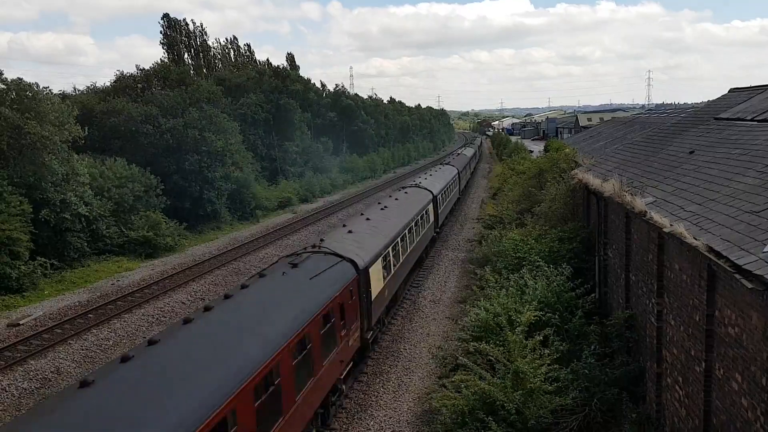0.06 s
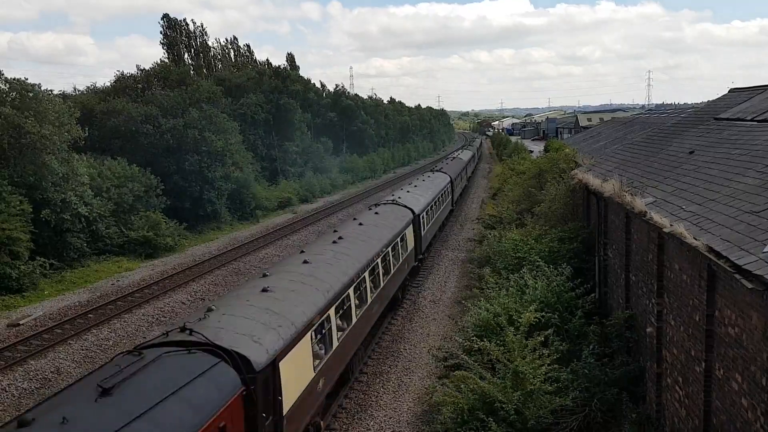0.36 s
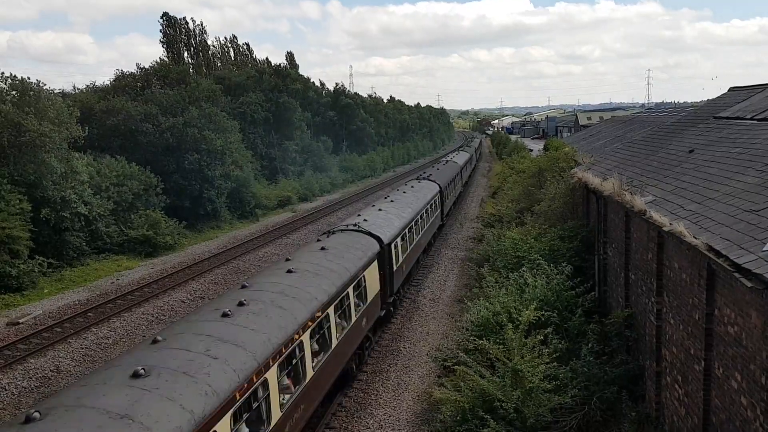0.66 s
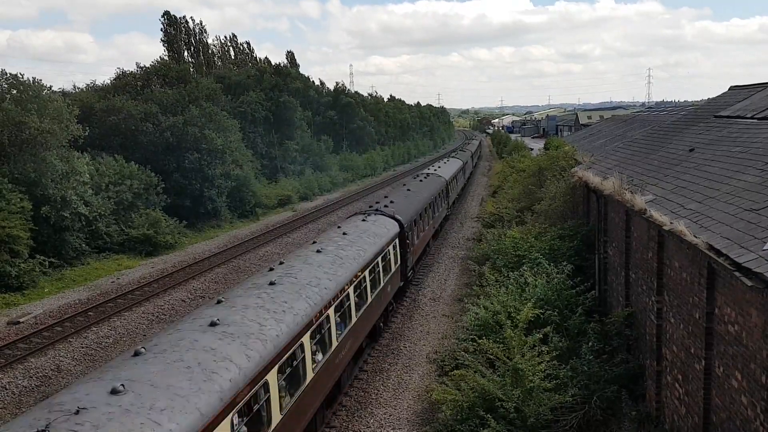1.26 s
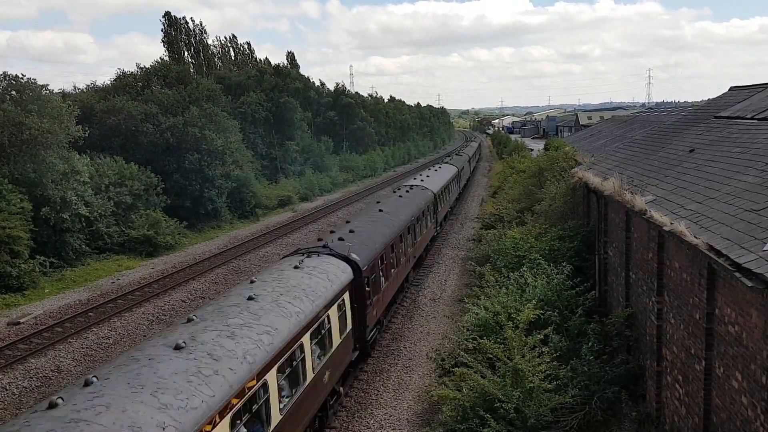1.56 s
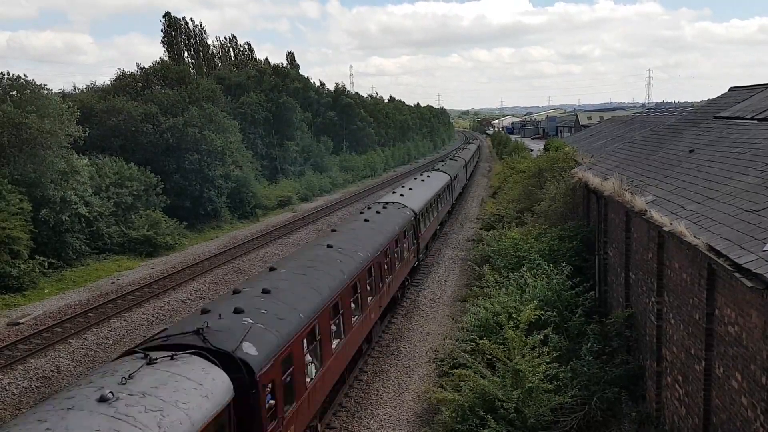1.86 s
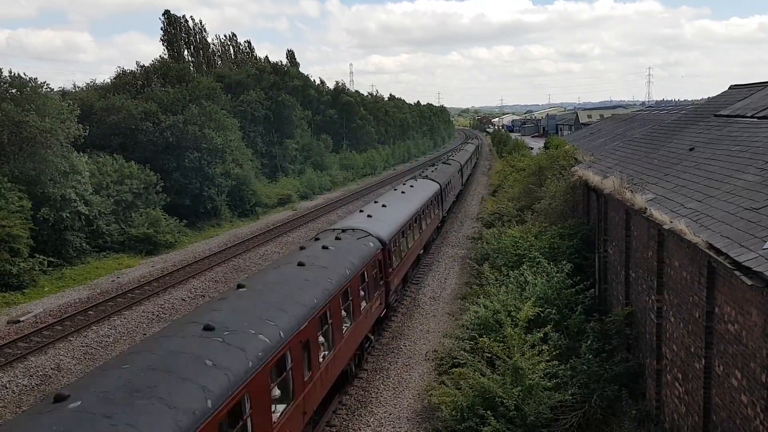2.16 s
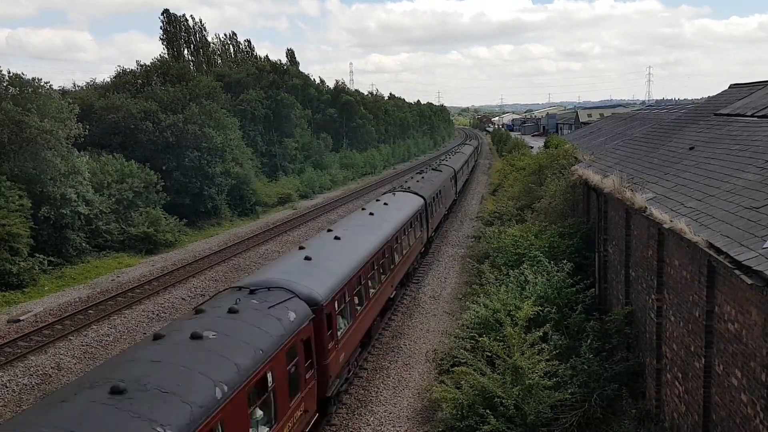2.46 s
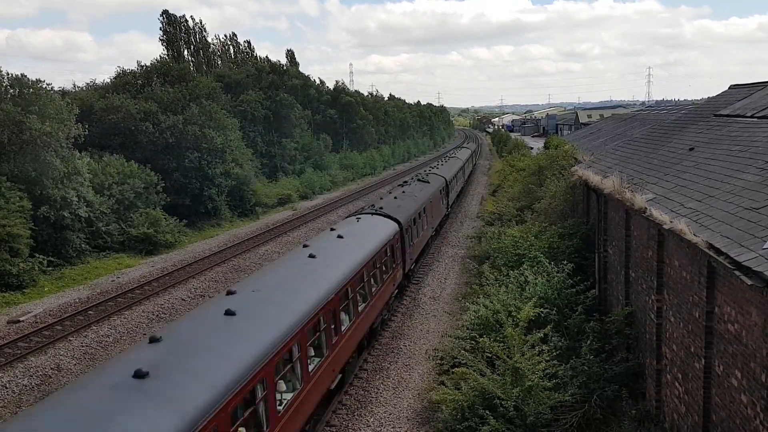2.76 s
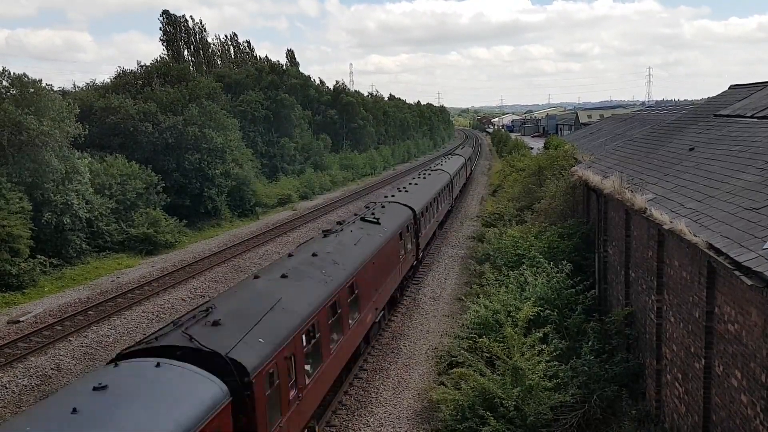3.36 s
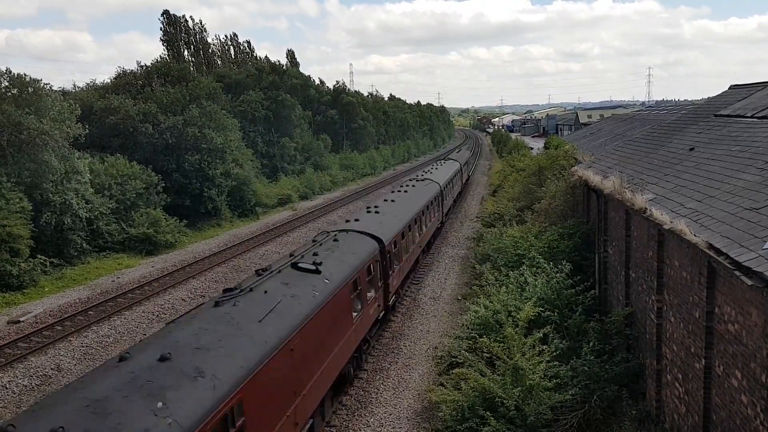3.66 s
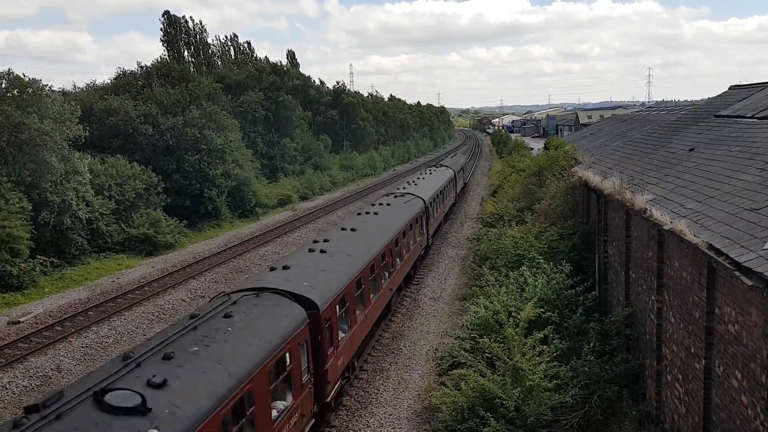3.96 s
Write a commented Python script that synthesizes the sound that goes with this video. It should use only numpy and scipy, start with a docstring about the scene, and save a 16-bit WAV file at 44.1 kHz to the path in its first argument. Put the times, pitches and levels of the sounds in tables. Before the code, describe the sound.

Railway coaches roll past outdoors, rumbling and hissing, their wheels knocking faintly on rail joints.

```python
"""Coaches below a footbridge

Railway coaches roll steadily away. Rough wheels drive the sleepers, the rails and their own rims into
broad resonances that swell and sink in pitch as each pair of bogies passes, over a rumble and a steely
hiss. Wheels knock faintly on rail joints and scuff the rail, and a breeze brushes the microphone."""
import sys
import numpy as np
from scipy.fft import rfft, irfft, next_fast_len
from scipy.io import wavfile
from scipy.ndimage import uniform_filter1d, minimum_filter1d, map_coordinates

SR = 44100
rng = np.random.default_rng(int(sys.argv[2]) if len(sys.argv) > 2 else 0)


def master_out(mix):
    """Clip the mix to full scale and print it as 16-bit PCM to the path in sys.argv[1]."""
    frames = np.transpose(np.atleast_2d(mix))
    ceiling = np.clip(frames, -1, 1)
    pcm = np.round(ceiling * 32767).astype(np.int16)
    wavfile.write(sys.argv[1], SR, pcm)


N = 176400

# The bright spectrum of rubbing steel. Each row: frequency in Hz, relative density in dB.
SIZZLE_SPECTRUM = [(3000, -26), (7000, 4), (8300, -4), (9300, -2.5), (12000, -1.5), (15700, -14.5)]


def amp(db):
    """Amplitude grows tenfold for every 20 dB."""
    return 10 ** (np.asarray(db) / 20)


def unit(x):
    """Normalisation scales a signal to rms 1."""
    return x / np.sqrt(np.mean(abs(x) ** 2) + 1e-20)


def along(points, hz):
    """Interpolation joins (Hz, value) points on a logarithmic frequency axis."""
    f, v = np.transpose(points)
    return np.interp(np.log(hz + 1), np.log(f + 1), v)


def curves(rows):
    """Linear interpolation turns each column after the time into one value per sample."""
    s, *cols = np.transpose(rows)
    return [np.interp(np.arange(N) / SR, s, c) for c in cols]


def wobble(rate):
    """A spline through random knots, rate of them a second, fluctuates smoothly."""
    return map_coordinates(rng.standard_normal(1000), [np.arange(N) * rate / SR], mode="mirror")


def filtered(x, response):
    """A linear filter multiplies the spectrum by its frequency response."""
    m = next_fast_len(N + SR // 2)
    return irfft(rfft(x, m) * response(np.fft.rfftfreq(m, 1 / SR)), m)[..., :N]


def spread(pair, alike, pan_db):
    """Mid-side mixing gives two independent signals a correlation (alike) and a balance (left over right)."""
    turn = np.arccos(np.clip(alike, -1, 1)) / 2
    mid, side = np.cos(turn) * pair[0], np.sin(turn) * pair[1]
    return np.array([(mid + side) * amp(pan_db / 2), (mid - side) * amp(-pan_db / 2)])


def rush(spectrum, alike, pan):
    """Spectral shaping colours stereo noise of rms 1; alike and pan are numbers or (Hz, value) points."""
    hz = np.fft.rfftfreq(N, 1 / SR)
    read = lambda v: along(v, hz) if np.ndim(v) else v
    coloured = rfft(rng.standard_normal((2, N))) * amp(along(spectrum, hz))
    return unit(irfft(spread(coloured, read(alike), read(pan)), N))


def resonance(hz, width_hz, alike, pan_db, evenness=0.27):
    """A randomly driven mode gives a noise band, here of rms 1; many wheels even out its level."""
    offset_hz = np.fft.fftfreq(N, 1 / SR)
    shape = 1 / (1 + (offset_hz / width_hz) ** 2) ** 2
    drive = rng.standard_normal((2, N)) + 1j * rng.standard_normal((2, N))
    envelope = spread(np.fft.ifft(drive * shape), alike, pan_db)
    power = abs(uniform_filter1d(np.mean(abs(envelope) ** 2, axis=0), size=3000)) + 1e-20
    carrier = np.exp(2j * np.pi * np.cumsum(hz * np.ones(N)) / SR)
    return unit((envelope / power ** (evenness / 2) * carrier).real)


def track():
    """Forced vibration: sleepers and rails swell under the bogies, their pitch swinging once a coach."""
    # Track modes. Each row: frequency in Hz, width in Hz, level in dB, share of the sleepers' swell,
    # pitch swing in Hz, left-right correlation, balance in dB.
    modes = [(397, 67, -26, 0.52, -14.5, 0.93, -4.5), (473.2, 79, -21, 1.3, 24.5, 1, -1.5),
             (560.6, 103, -21, .8, 10, 0.94, -1), (771, 94, -22, 0.45, 6, 1, 1.9),
             (859, 132, -20.5, 0.1, 10.5, 0.8, 1)]
    # The sleepers' drone, the rail's narrow ring and its high singing.
    # Each row: time in seconds, relative level in dB.
    sleeper_swell = [(0, 0), (.2, -2.5), (.55, 4.5), (.75, 1), (.97, -2), (1.25, 1.5), (1.8, -2.5),
                     (2.07, 2.6), (2.55, -5), (2.85, 3), (3, -2.5), (3.3, -1), (3.58, 1), (3.7, -.5),
                     (3.85, 1.3), (3.92, -4.5)]
    ring_levels = [(0, -33), (.4, -32), (.72, -21.5), (1.3, -29.5), (1.5, -29), (1.72, -24), (2.3, -25),
                   (2.7, -23), (3.1, -22.5), (3.35, -26), (3.55, -21.5), (3.85, -22), (4, -29)]
    sing_levels = [(0, -46), (.5, -39.5), (.9, -42), (1.15, -39.5), (1.5, -41), (2, -42.5), (2.35, -43.5),
                   (2.8, -40), (3.15, -44.5), (3.42, -41), (3.6, -46.5), (3.73, -43), (4, -47.5)]
    first_bogie_s, coach_period_s = .54, .775
    swell_db, = curves(sleeper_swell)
    ring_db, = curves(ring_levels)
    sing_db, = curves(sing_levels)
    bend = -np.sin(2 * np.pi * (np.arange(N) / SR - first_bogie_s) / coach_period_s)
    drone = sum(amp(db + share * swell_db) * resonance(hz + swing * bend, width, alike, pan)
                for hz, width, db, share, swing, alike, pan in modes)
    sing = resonance(hz=2750, width_hz=530, alike=.2, pan_db=-0.5)
    ring = resonance(hz=860.5 + 10 * bend, width_hz=52, alike=0.82, pan_db=-2.0, evenness=1.0)
    return drone + amp(sing_db) * sing + amp(ring_db + 2) * ring


def wheels():
    """Wheel modes: the rims ring in a slowly sinking band amid broader ones; one briefly rings higher."""
    # The rims' ring and the higher ring. Each row: time in seconds, pitch in Hz, level in dB.
    rim_path = [(0, 1440, -34), (.25, 1450, -27), (.52, 1490, -25), (.82, 1475, -23.5), (1.05, 1452, -24),
                (1.45, 1430, -25.5), (1.7, 1440, -26), (1.95, 1435, -28), (2.12, 1445, -25),
                (2.35, 1440, -29.5), (2.68, 1480, -23), (2.87, 1450, -35), (3.02, 1435, -20.5),
                (3.14, 1420, -33.5), (3.4, 1390, -30.5), (3.65, 1385, -35.5), (3.78, 1415, -26.5),
                (4, 1415, -30)]
    high_path = [(3.15, 1970, -60), (3.27, 1960, -34), (3.42, 1940, -39), (3.7, 1840, -44.5),
                 (3.95, 1800, -61.5)]
    # Broad modes. Each row: frequency in Hz, width in Hz, relative level in dB, correlation, balance in dB.
    modes = [(1069.6, 280, 10.5, 0.21, -1.5), (1844, 160, -3.5, 0.36, -0.5), (2057, 380, -7, 0.35, -6)]
    # Their common gain. Each row: time in seconds, gain in dB.
    mode_gains = [(0, -40.5), (.6, -39), (1.1, -36), (1.5, -33), (2, -38), (2.35, -39), (2.6, -33.5),
                  (3, -33), (3.3, -33.5), (3.6, -39), (4, -42.5)]
    rim_hz, rim_db = curves(rim_path)
    high_hz, high_db = curves(high_path)
    broad_db, = curves(mode_gains)
    broad = sum(amp(db) * resonance(hz, width, alike, pan, evenness=0.18)
                for hz, width, db, alike, pan in modes)
    rim = amp(rim_db) * resonance(rim_hz, width_hz=98, alike=-0.88, pan_db=8.0)
    high = amp(high_db) * resonance(high_hz, width_hz=77, alike=.6, pan_db=-3.5)
    return rim + high + amp(broad_db) * broad


def roar():
    """Rolling noise: the whole train radiates a broadband rumble that wavers in level."""
    spectrum = [(20, -34), (40, -17), (62, -15), (125, -8.5), (175, -10), (250, -5.5), (315, -7),
                (500, 0.5), (680, -2), (950, 1.5), (1120, -3.5), (1300, -4.5), (1480, -11), (1640, -19.5),
                (2300, -31), (3200, -46), (6000, -76)]  # Each row: frequency in Hz, relative density in dB.
    likeness = [(40, 0.77), (90, 1), (200, 0.93), (480, 0.97), (680, 0.42), (880, 0.61), (1000, -0.38),
                (1150, 0.058), (1350, -1.02), (1650, 0.73)]  # Each row: frequency in Hz, left-right correlation.
    balance = [(40, -7.5), (90, 2.5), (170, -2), (500, 3.5), (700, -5), (1050, -4), (1300, -0.5),
               (1600, 7.5), (2300, -13.5)]  # Each row: frequency in Hz, balance in dB.
    return amp(-15.5 + 1.5 * wobble(rate=8.36)) * rush(spectrum, likeness, balance)


def hiss():
    """Friction of steel on steel gives a steady hiss, with a bright sizzle that comes and goes."""
    spectrum = [(1200, -15.5), (2200, 6.5), (3000, -0.5), (3400, -1), (4200, -2.5), (5200, -5), (6200, -9),
                (7200, -14), (8100, -12), (9200, -21.5), (11000, -20.5), (13000, -30.5), (15700, -36)]  # Each row: frequency in Hz, relative density in dB.
    balance = [(2800, 1.5), (3900, -2), (4600, -1), (6200, -1), (8000, -5), (10000, 1.5)]  # Each row: frequency in Hz, balance in dB.
    # Envelopes of the hiss and the sizzle. Each row: time in seconds, relative level in dB.
    hiss_levels = [(0, -46.5), (.1, -47), (.35, -46.5), (.52, -45), (.6, -46.5), (1.1, -45.5),
                   (1.27, -45.5), (1.34, -47), (1.42, -46), (1.51, -44.7), (1.57, -47), (1.68, -47.5),
                   (1.73, -46), (2.2, -47.5), (2.34, -48.5), (2.5, -46.5), (3.05, -45.5), (3.43, -44.5),
                   (3.55, -45.5), (3.61, -48), (3.74, -45.7), (3.92, -48)]
    sizzle_levels = [(0, -59.5), (.12, -63.5), (.35, -65), (.5, -58.5), (.62, -64.5), (1.1, -63),
                     (1.28, -60), (1.5, -62), (1.6, -67.5), (2.15, -61), (2.35, -67.5), (2.7, -62),
                     (3.1, -59), (3.2, -56.5), (3.44, -56.5), (3.55, -57), (3.63, -60), (3.76, -58.5),
                     (4, -66)]
    hiss_db, = curves(hiss_levels)
    sizzle_db, = curves(sizzle_levels)
    flutter_db = 0.67 * wobble(rate=16)
    body = amp(7.5 + hiss_db + flutter_db) * rush(spectrum, alike=-.1, pan=balance)
    sizzle = amp(sizzle_db + 2.2 * flutter_db) * rush(SIZZLE_SPECTRUM, alike=.05, pan=-.6)
    return body + sizzle


def breeze():
    """Turbulent pressure: wind buffets the microphone ports in soft, low lumps."""
    gusts = [(0, -47), (.36, -49), (.41, -30.5), (.7, -32), (.95, -41.5), (1.28, -34.5), (1.5, -37),
             (1.65, -50), (2.3, -47.5), (4, -58)]  # Each row: time in seconds, mean level in dB.
    spectrum = [(15, -34), (28, -16), (42, 1), (75, -0.5), (120, -0.5), (250, -33), (800, -82)]  # Each row: frequency in Hz, relative density in dB.
    gust_db, = curves(gusts)
    return amp(gust_db + 2.5 * wobble(rate=18)) * rush(spectrum, alike=0.24, pan=-11.5)


def joints():
    """Impact excitation: a wheel crossing a joint gives a dull thud, a short shudder and a faint tick."""
    # Each row: start in seconds, thud level in dB, thud frequency in Hz, tick level in dB.
    impacts = [(0.031, -22, 226, -53), (0.524, -21, 182, -54.5), (1.156, -29, 200, -46.5),
               (1.265, -30, 116, -48), (1.382, -20, 253, -52), (1.503, -15.5, 197, -42),
               (1.613, -15.5, 265, -64.5), (1.732, -20.5, 247, -52), (1.756, -22.5, 228, -58),
               (1.946, -21.5, 242, -60), (1.977, -21, 236, -53), (2.3, -28, 83, -68.5),
               (2.897, -23, 159, -47.5), (3.41, -23, 269.5, -48), (3.715, -27, 220, -52)]
    tick_spectrum = [(800, -5.5), (2500, -3.5), (5000, 2), (8000, -6.5), (10000, -12), (15700, -19.5)]  # Each row: frequency in Hz, relative density in dB.
    thud_rise_s, noise_rise_s, tick_t60_s = .009, .003, .2
    shudder_db, shudder_t60_s, shudder_octaves = -6, 0.19, .5
    out = np.zeros((2, N))
    for start, thud_db, hz, tick_db in impacts:
        t = np.maximum(np.arange(N) / SR - start, 0)
        push = (t / thud_rise_s * np.exp(1 - t / thud_rise_s)) ** 2
        thud = push * np.sin(2 * np.pi * (hz * t + rng.random()))
        band = lambda f: np.exp(-.5 * (np.log2((f + 1) / hz) / shudder_octaves) ** 2)
        shudder = unit(filtered(rng.standard_normal(N), band))
        shudder *= amp(thud_db + shudder_db - 60 * t / shudder_t60_s)
        tick = rush(tick_spectrum, alike=.1, pan=-.8) * amp(tick_db - 60 * t / tick_t60_s)
        out += amp(thud_db) * thud + (1 - np.exp(-t / noise_rise_s)) * (shudder + tick)
    return out


def surges():
    """Narrowband resonance: rough wheels make the rail's ring surge briefly on an almost pure note."""
    # Each row: time of the peak in seconds, length in seconds, pitch in Hz, level in dB.
    swells = [(.12, .08, 860, -19), (.83, .16, 855, -18.5), (1.472, .1, 840, -11.5), (1.595, .1, 856, -13),
              (2.98, .13, 867, -13.5), (3.155, .06, 861, -16.5)]
    out = np.zeros((2, N))
    for peak, length, hz, db in swells:
        swell = np.cos(np.pi * np.clip((np.arange(N) / SR - peak) / length, -.5, .5))
        out += amp(db) * swell * resonance(hz, width_hz=26, alike=1.0, pan_db=-2.5, evenness=1.0)
    return out


def scrapes():
    """Sliding friction: a wheel scuffs the rail in a short, gritty flick of sizzle."""
    scuffs = [(1.27, -56), (1.51, -54.5), (2.92, -55), (3.19, -56), (3.425, -52.5), (3.54, -56)]  # Each row: time of the peak in seconds, level in dB.
    half_width_s, grit_db = .022, 2.2
    t = np.arange(N) / SR
    flicks = sum(amp(db) * np.exp(-((t - peak) / half_width_s) ** 2) for peak, db in scuffs)
    grit = amp(grit_db * wobble(rate=240))
    return flicks * unit(grit * rush(SIZZLE_SPECTRUM, alike=.1, pan=-1.2))


def scene():
    """Superposition: the train reaches the two ports slightly out of phase; the breeze blows on them."""
    port_phase = [(650, 0), (740, 0.55), (880, -0.17), (1100, .8), (1350, -0.19), (1750, -.3), (2450, 1.2),
                  (3000, 0)]  # Each row: frequency in Hz, lead of the left port in radians.
    phase_shift = lambda hz: np.exp(.5j * np.outer([1, -1], along(port_phase, hz)))
    train = track() + surges() + wheels() + roar() + hiss() + scrapes() + joints()
    return filtered(train, phase_shift) + breeze()


def record(dry):
    """Peak limiting holds down the highest peaks, and a low-pass filter limits the bandwidth."""
    ceiling, smoothing_s, top_hz = .93, .012, 15720
    needed_gain = np.minimum(1, ceiling / (abs(dry).max(axis=0) + 1e-9))
    size = int(smoothing_s * SR)
    gain = uniform_filter1d(minimum_filter1d(needed_gain, size=2 * size), size=size)
    return filtered(dry * gain, lambda hz: hz < top_hz)


dry = scene()
out = record(dry)
master_out(out)
```